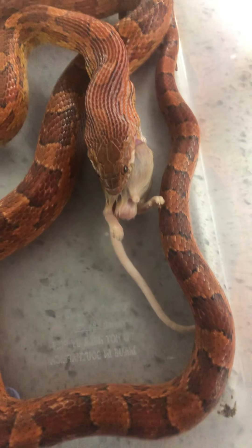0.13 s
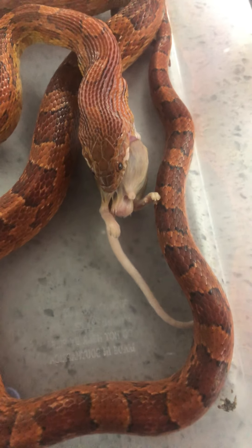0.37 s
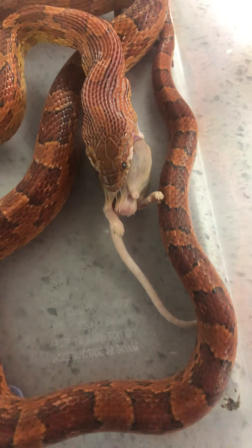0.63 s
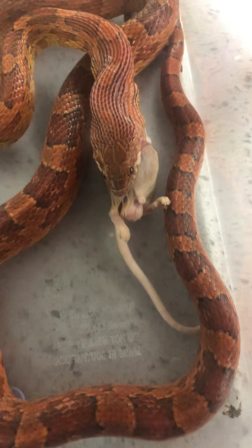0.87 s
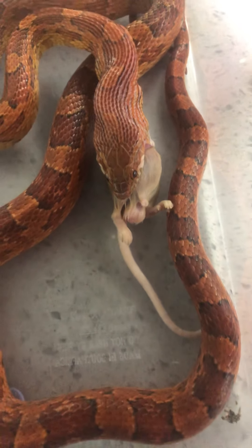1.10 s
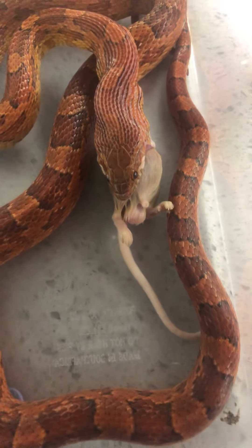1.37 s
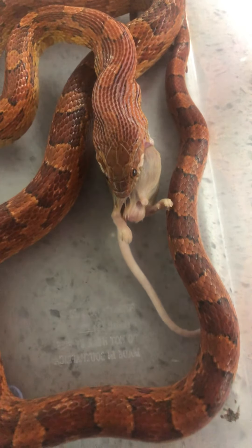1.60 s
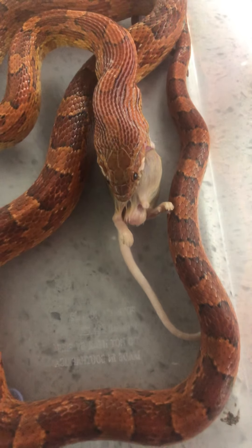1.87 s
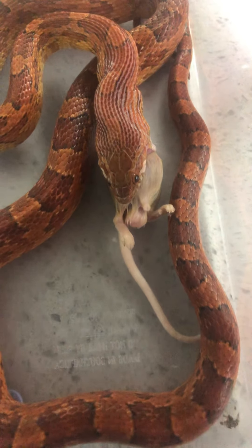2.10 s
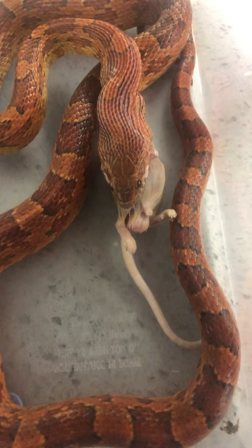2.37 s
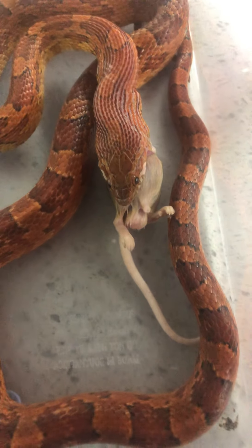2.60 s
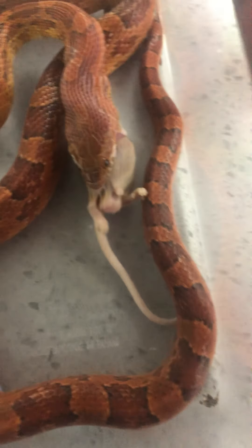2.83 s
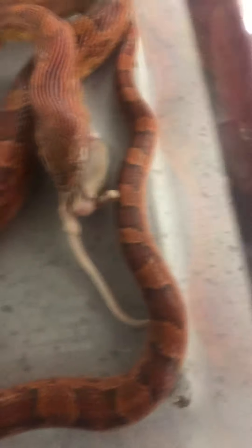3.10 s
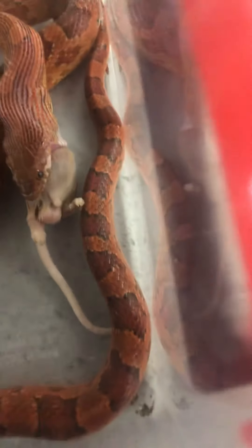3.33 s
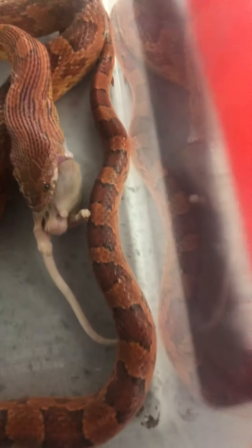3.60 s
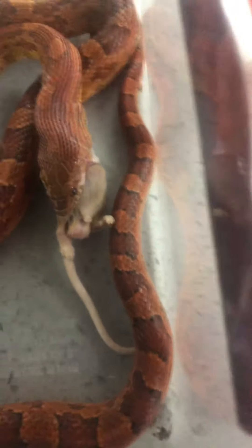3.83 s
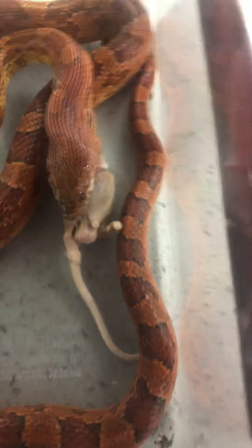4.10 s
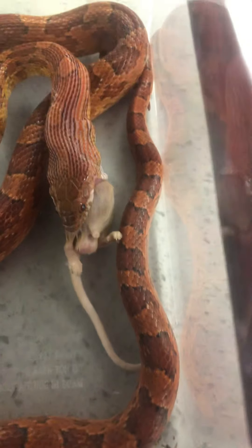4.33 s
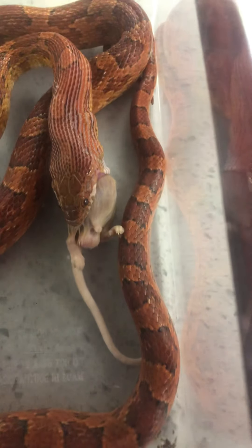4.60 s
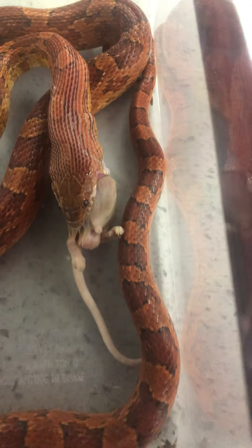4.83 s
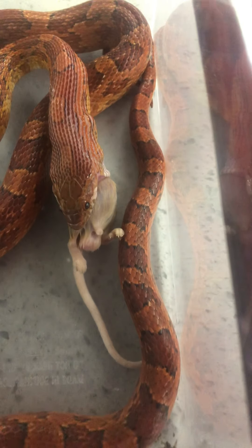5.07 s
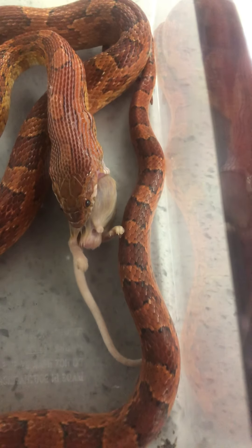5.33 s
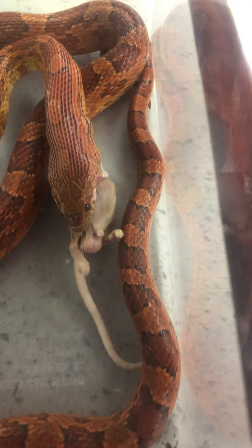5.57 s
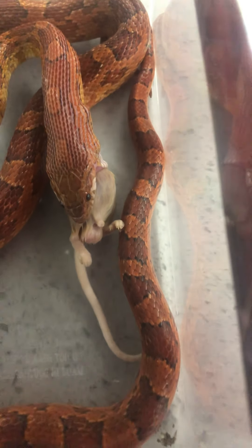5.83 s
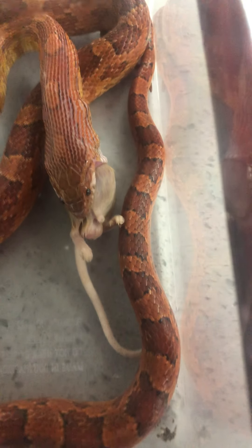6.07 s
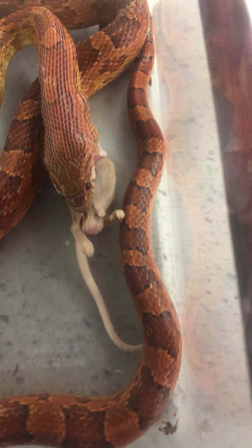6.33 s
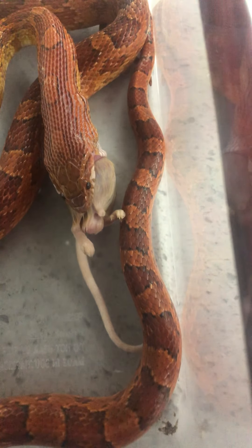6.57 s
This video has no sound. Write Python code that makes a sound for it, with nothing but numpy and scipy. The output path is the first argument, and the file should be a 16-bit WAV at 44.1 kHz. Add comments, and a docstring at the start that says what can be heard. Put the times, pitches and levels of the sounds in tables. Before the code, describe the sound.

Smooth faint room hiss with soft rubbing and low handling thumps, swelling to loud hollow knocks around three seconds, then mostly quiet again.

```python
"""A smooth hiss and a faint low hum come first; soft rubbing, thumps and hollow knocks soon join them.
A small camera is held close over a plastic tub in a quiet room while fingers slide, slip and knock on it.
The shake reaches the microphone through the body: low thumps and a hollow ring near 650 Hz.
Hiss is coloured noise and hum a wavering sine. Rubbing is random jerks through resonances,
thumps are swelling sines that sag in pitch, and knocks are groups of dying sines after a short tick."""
import sys
import numpy as np
from scipy import signal
from scipy.fft import rfft, irfft, next_fast_len
from scipy.io import wavfile
from scipy.ndimage import uniform_filter1d

SR = 44100
rng = np.random.default_rng(int(sys.argv[2]) if len(sys.argv) > 2 else 0)


def bounce(signal):
    """Save signal as a 16-bit WAV file at the path given by the first command-line argument."""
    frames = np.transpose(np.atleast_2d(signal))
    limited = np.clip(frames, -1, 1)
    pcm = np.round(limited * 32767).astype(np.int16)
    wavfile.write(sys.argv[1], SR, pcm)


def attenuation_scalar(level_db):
    """Turn a level in dB into a linear amplitude multiplier (20 dB per decade)."""
    decades = np.asarray(level_db, float) / 20
    return 10 ** decades


N = 295029   # length in samples


def rms_one(x):
    """Scales a sound to an rms of 1."""
    return x / np.sqrt(np.mean(x ** 2) + 1e-20)


def cut(x, hz, kind, order):
    """Keeps only the low, high or middle part of the spectrum."""
    return signal.sosfilt(signal.butter(order, hz, kind, fs=SR, output="sos"), x)


def add(out, start_s, sound):
    """Mixes a short sound in at a time."""
    i = round(start_s * SR)
    out[i:i + len(sound)] += sound[:N - i]


def drift(rate_hz):
    """Slow random wandering with an rms of 1: noise smoothed twice, on every 40th sample."""
    step = 40
    r = np.exp(-2 * np.pi * rate_hz * step / SR)
    settle = 4000   # points thrown away while the smoothing starts up
    noise = rng.standard_normal(N // step + settle + 2)
    slow = signal.lfilter([1], [1, -2 * r, r * r], noise)[settle:]
    return np.interp(np.arange(N) / step, np.arange(len(slow)), rms_one(slow))


# colour of the steady noise, as relative power per Hz: pitch_hz, level_db
HISS_COLOUR = [(25, -27), (38, -20), (70, -2), (130, -2), (300, -0.5), (1000, -1.5), (2700, -2),
               (4000, -10), (6900, -21.5), (9500, -22), (10400, -37), (15000, -39)]


def hiss():
    """Smooth steady noise of room air and microphone: white noise shaped by a curve."""
    level_db = -48.5   # rms
    hz, db = np.transpose(HISS_COLOUR)
    size = next_fast_len(N)
    bins_hz = np.maximum(np.arange(size // 2 + 1) * SR / size, 1)
    colour = attenuation_scalar(np.interp(np.log(bins_hz), np.log(hz), db))
    noise = irfft(rfft(rng.standard_normal(size)) * colour, size)[:N]
    return attenuation_scalar(level_db) * rms_one(noise)


def hum():
    """A low sine whose level and phase waver a little."""
    pitch_hz, level_db, waver_db = 49.6, -63.5, 1.5
    level = np.sqrt(2) * attenuation_scalar(level_db + waver_db * drift(4))   # root 2 turns rms into peak
    phase = 2 * np.pi * pitch_hz * np.arange(N) / SR + .4 * drift(2.5)
    return level * np.sin(phase)


def resonate(x, modes):
    """Resonances side by side, with alternating signs."""
    out = 0
    for k, (hz, width_hz, db) in enumerate(modes):
        r = np.exp(-np.pi * width_hz / SR)
        poles = [1, -2 * r * np.cos(2 * np.pi * hz / SR), r * r]
        out = out + (-1) ** k * attenuation_scalar(db) * signal.lfilter([1 - r, 0, r - 1], poles, x)
    return out


def slips(per_s, uneven_db, clump_db):
    """Stick-slip: random small jerks of uneven size that come in clumps."""
    sizes = attenuation_scalar(uneven_db * np.minimum(rng.exponential(1, N), 4)) * rng.choice([-1, 1], N)
    happens = rng.random(N) < per_s / SR
    return sizes * happens * attenuation_scalar(clump_db * drift(38)) + 1e-18


def evened(x, window_s, share):
    """Evens out a share of the random swell of the rubbing noise; rms 1."""
    level = np.sqrt(uniform_filter1d(rms_one(x) ** 2, size=int(window_s * SR)) + .01)
    return rms_one(x / level ** share)


def after(starts_s, tops_db, lengths_s):
    """Power of tails that fall 60 dB over their length after given moments."""
    out = np.zeros(N)
    for start_s, top_db, length_s in zip(starts_s, tops_db, lengths_s):
        age_s = np.arange(int(length_s * SR)) / SR
        add(out, start_s, attenuation_scalar(2 * (top_db - 60 * age_s / length_s)))
    return out


# short strokes of skin along the housing, each one swell; levels before the trims in sliding():
# start_s, length_s, low_shake_db, shell_ring_db
STROKES = [(0.23, 0.14, -46, -53.5), (0.512, 0.17, -33.5, -40.5), (0.676, 0.16, -36.5, -41),
           (0.92, 0.17, -33.5, -39.5), (1.11, 0.16, -38, -46.5), (1.631, 0.076, -40, -48),
           (2.021, 0.11, -49, -50.5), (2.133, 0.18, -47.5, -47), (2.298, 0.057, -42, -64),
           (4.014, 0.28, -45, -38.5), (4.426, 0.15, -35, -39), (5.5, 0.17, -46.5, -62),
           (6.11, 0.2, -39, -50.5), (6.648, 0.04, -38.5, -53)]
# long drags while the camera is moved, one list of points per drag; levels before the same trims:
# time_s, low_shake_db, shell_ring_db
DRAGS = [
    [(2.57, -53, -72), (2.61, -39.5, -48.5), (2.72, -27, -31), (2.75, -19.5, -22.5), (2.8, -19, -28),
     (2.856, -25.5, -26), (2.94, -28, -27.5), (2.97, -25, -33), (3.09, -30, -30), (3.146, -18, -20.5),
     (3.182, -2.5, -16.5), (3.24, -18.5, -25.5), (3.3, -23, -34.5)],
    [(3.51, -45, -49), (3.55, -31, -36.5), (3.61, -25, -39.5), (3.697, -15.5, -31), (3.735, -28, -46),
     (3.775, -25.5, -33), (3.855, -39.5, -42.5), (3.88, -26, -31), (3.94, -36, -38.5), (3.994, -19, -30),
     (4.03, -41, -55)],
    [(4.19, -38, -47), (4.21, -26, -28.5), (4.246, -31.5, -33), (4.33, -37, -45), (4.42, -47, -46)],
]
# where the skin slides fastest; the spans may overlap: start_s, end_s
FAST_DRAGS = [(2.78, 3.4), (3.1, 3.22)]


def slide_levels():
    """Gains of shake, ring and scratch: strokes, drags and the tails of lurches and knocks add in power."""
    t = np.arange(N) / SR
    power = np.zeros((2, N))   # row 0 is low shake, row 1 is shell ring

    peak_at = 0.4   # share of the stroke's length
    edge_db, roundness = 22, 1.78   # fall to either end; a roundness of 1 would be pointed
    for start_s, length_s, *tops_db in STROKES:
        turns_s = start_s + length_s * np.array([0, peak_at, 1])
        away = np.interp(t, turns_s, [1, 0, 1], left=5, right=5)   # 0 at the top, 1 at the ends
        power += attenuation_scalar(2 * (np.array(tops_db)[:, None] - edge_db * away ** roundness))

    for drag in DRAGS:
        s, *levels_db = np.transpose(drag)
        power += [attenuation_scalar(2 * np.interp(t, s, db, left=-200, right=-200)) for db in levels_db]

    # the hand shudders on after each lurch
    s, db, _, _ = np.transpose(THUMPS)
    power[0] += after(s + 0.022, db - 17, np.full(len(s), 0.21))

    # the finger chatters on after each knock, longer where the ring is longer
    s, db, _, stretch = np.transpose(TAPS)
    power[1] += after(s, db - 11, 0.099 * stretch)
    # a knock, too, leaves the body shuddering
    power[0] += after(s, db - 18.5, np.full(len(s), 0.37))

    low, ring = uniform_filter1d(np.sqrt(power), size=220, axis=1)   # 5 ms of smoothing
    fast = sum((t > start_s) & (t < end_s).astype(int) for start_s, end_s in FAST_DRAGS)
    scratch = ring * attenuation_scalar(5 * fast - 30.5)   # each fast span adds 5 dB of scratch, 10 dB where two overlap
    return low, ring, scratch


# resonances of the body on the soft hand: pitch_hz, width_hz, relative level_db
BODY = [(70, 16, -6.5), (105, 49.5, -1), (135, 34.2, 2.5), (180, 63.5, -2), (224, 190, -11),
        (335.4, 37.5, -11.5)]
# resonances of the hollow shell, rung by sliding here and by taps below:
# pitch_hz, width_hz, relative level_db
SHELL = [(518, 127, 0.5), (618.6, 85.6, 5), (684.4, 75, 5.5), (780, 81, 0), (886, 123, -6.5),
         (1078, 72, -7), (1134, 72, -12)]


def sliding():
    """Skin catches and slips along the housing: the jerks shake the body, ring the shell and scratch."""
    low, ring, scratch = slide_levels()
    shell_jerks = slips(1500, uneven_db=2.0, clump_db=-2.0)
    body_jerks = slips(400, uneven_db=0.5, clump_db=5.0)
    shake = cut(resonate(body_jerks, BODY), 370, "low", order=4)
    shell = cut(resonate(shell_jerks, SHELL), 310, "high", order=3)
    shell = cut(shell, 1310, "low", order=5)
    skin_grain = slips(6700, uneven_db=1.5, clump_db=-4.5)   # finer and denser
    grit = cut(skin_grain, (1260, 2390), "band", order=2)
    shake = attenuation_scalar(-3.5) * low * evened(shake, 0.013, share=1.0)
    shell = attenuation_scalar(-0.5) * ring * evened(shell, 0.031, share=1.0)
    return shake + shell + scratch * evened(grit, 0.01, share=0.48)


# the grip shifts and the whole body lurches; the swell tops out at about 0.8 of its time scale,
# and the pitch sags from about 1.4 to 0.7 times the base:
# start_s, swell_db, base_pitch_hz, swell_time_scale_s
THUMPS = [(0.769, -35.5, 98, 0.015), (1.012, -12, 143, 0.011), (1.037, -28, 175, 0.028),
          (1.141, -41, 135, 0.018), (1.616, -38.5, 216, 0.013), (1.803, -15.5, 156.5, 0.012),
          (2.038, -45, 102, 0.01), (2.245, -37, 105, 0.0094), (2.309, -34, 161, 0.011),
          (2.535, -31.5, 172, 0.014), (2.733, -14.5, 184.3, 0.013), (2.779, -27, 148, 0.013),
          (2.821, -48, 98, 0.0069), (2.948, -11, 115, 0.0083), (3.005, -19, 160, 0.029),
          (3.056, -14, 141.6, 0.011), (3.071, -18.5, 152, 0.0095), (3.123, -21.5, 181.6, 0.012),
          (3.145, 0.5, 166, 0.0064), (3.17, -16.5, 145.5, 0.022), (3.196, -14, 111, 0.0039),
          (3.247, 0.5, 121, 0.01), (3.563, -19.5, 148, 0.0069), (3.615, -17.5, 183, 0.017),
          (3.646, -17, 134, 0.013), (3.687, -9.5, 152, 0.02), (3.785, -25, 191, 0.014),
          (3.879, -23.5, 153.6, 0.012), (3.979, -17, 197, 0.009), (4.146, -9.5, 133, 0.0095),
          (4.216, -18, 126, 0.013), (4.483, -38.5, 180, 0.033), (4.555, -39, 135, 0.018),
          (5.488, -30.5, 185, 0.018), (5.512, -28.5, 70.0, 0.015), (6.16, -29, 97, 0.0064)]


def thumps():
    """A soft push swells for a cycle or two, then the hand damps it fast; its pitch sags as the hand gives."""
    out = np.zeros(N)
    t = np.arange(int(.2 * SR)) / SR
    for start_s, db, hz, rise_s in THUMPS:
        age = t / np.clip(rise_s, .004, .04)
        swell = age ** 1.27 * np.exp(-1.2 * age ** 1.425)
        cycles = hz * (t + 0.0098 * (1 - np.exp(-t / 0.014)) - 0.27 * t)
        wobble = np.sin(2 * np.pi * cycles)
        sway = 0.37 * np.sin(2 * np.pi * 0.48 * cycles)   # slower, under the wobble
        add(out, start_s, attenuation_scalar(db) * swell / swell.max() * (wobble + sway))
    return out


# a fingertip knocks or slips on the shell; the tick level is before its lift in taps():
# start_s, ring_peak_db, tick_db, ring_stretch (factor)
TAPS = [(0.72, -39, -56, 0.93), (1.011, -24, -58, 2.5), (1.621, -34.5, -53, 1.1), (1.802, -30, -60, 1.16),
        (2.312, -28.5, -39, 0.62), (2.534, -36, -57, 0.95), (2.741, -22, -44, 0.77),
        (2.816, -14.5, -64, 1.4), (2.896, -17.5, -49, 1.8), (3.061, -21, -46, 2.9),
        (3.113, -22, -45.5, 1.2), (3.147, -7, -32, 2.4), (3.164, -10.5, -24, 2), (3.185, -0.5, -55, 1.2),
        (3.199, -20, -38, 1.3), (3.219, -9, -60, 0.71), (3.246, -3.5, -32, 1.16), (3.542, -17, -29, 1.3),
        (3.554, -13, -53, 0.25), (3.617, -14.5, -37, 1.22), (3.686, -20, -42.5, 1.4),
        (3.741, -27, -53, 0.65), (3.862, -20, -53, 0.87), (3.873, -19.5, -34, 0.9), (3.948, -23, -42, 2.9),
        (4.142, -18.5, -57.5, 2.3), (4.208, -22.5, -53, 1.2), (4.235, -42, -60, 0.91),
        (4.484, -28.5, -59, 1.3), (4.497, -31, -55, 1.1), (5.468, -24.5, -51, 0.78),
        (5.487, -16.5, -33.5, 0.8), (6.116, -26, -63, 2.1), (6.124, -18.5, -58, 0.69),
        (6.658, -25.5, -51, 1)]


def taps():
    """Each knock rings every shell mode with a strength of its own, with a short bright tick at its start."""
    hardness_mid_db, tilt_per_hardness = -23.5, 0.33   # tilt: dB an octave for each dB of hardness
    tick_lift_db = 17.0
    out = np.zeros(N)
    t = np.arange(int(.12 * SR)) / SR
    strengths_db = 2.5 * rng.standard_normal((len(TAPS), len(SHELL)))
    hz, width_hz, mode_db = np.transpose(SHELL)[:, :, None]
    tick = t / .00025 * np.exp(-t / .00025) * np.sin(2 * np.pi * 1900 * t)
    for (start_s, db, tick_db, stretch), own_db in zip(TAPS, strengths_db):
        # a knock with a stronger tick rings the upper modes more
        hardness_db = np.clip(tick_db - db - hardness_mid_db, -20, 20)
        tilt_db = tilt_per_hardness * hardness_db * np.log2(hz / hz.mean())
        fade = np.exp(-np.pi * width_hz * t / stretch)
        modes = attenuation_scalar(mode_db + own_db[:, None] + tilt_db) * fade * np.sin(2 * np.pi * hz * t)
        ring = modes.sum(axis=0) * (1 - np.exp(-t / .0035))   # a fingertip is a soft contact
        knock = attenuation_scalar(db) * ring / np.abs(ring).max()
        add(out, start_s, knock + attenuation_scalar(tick_db + tick_lift_db) * tick)
    return out


def scene():
    """Handling sounds pass through the housing, then join the hiss and hum."""
    handling = sliding() + thumps() + taps()
    handling = cut(handling, 53, "high", order=4)   # the slowest sway does not reach the capsule
    handling = cut(handling, 4500, "low", order=2)   # the housing carries little treble
    return (handling + hiss() + hum())[None]


def top_cut(x):
    """Nothing passes above the cut-off."""
    return signal.sosfilt(signal.butter(12, 15620, fs=SR, output="sos"), x)


def record(dry):
    """The loudest peaks are rounded off smoothly so that they stay below a limit."""
    limit = .95   # of full scale
    rounded = dry / (1 + np.abs(dry / limit) ** 4) ** .25
    return top_cut(rounded)


dry = scene()
out = record(dry)
bounce(out)
```